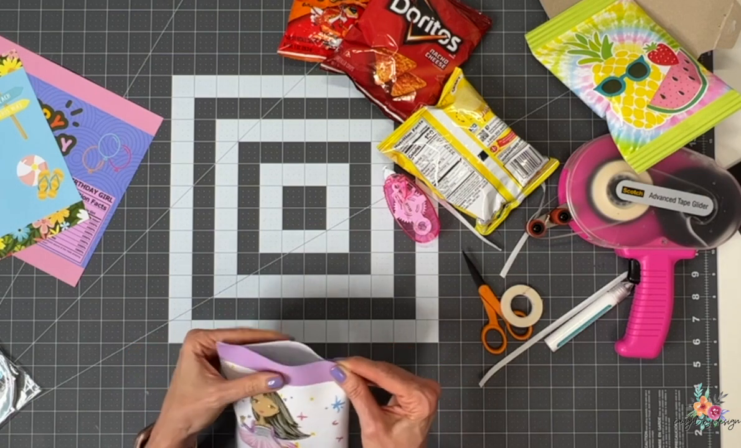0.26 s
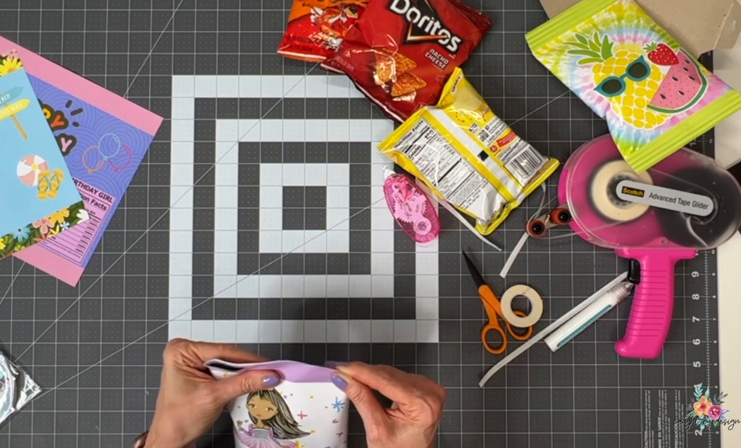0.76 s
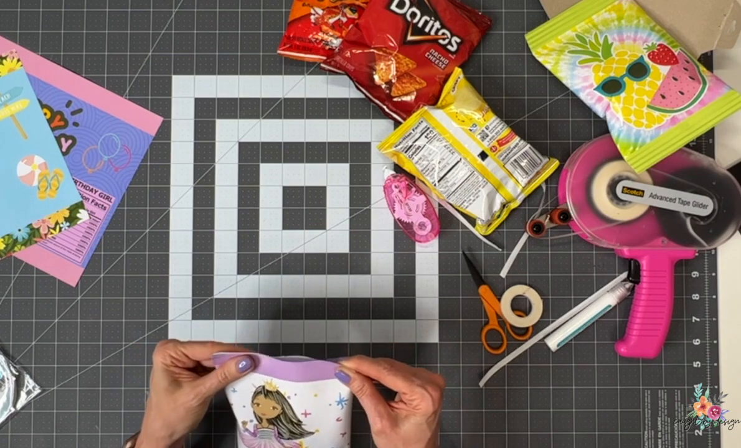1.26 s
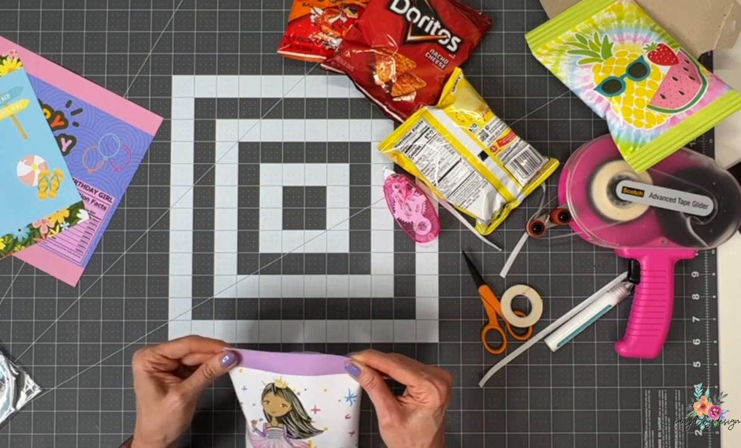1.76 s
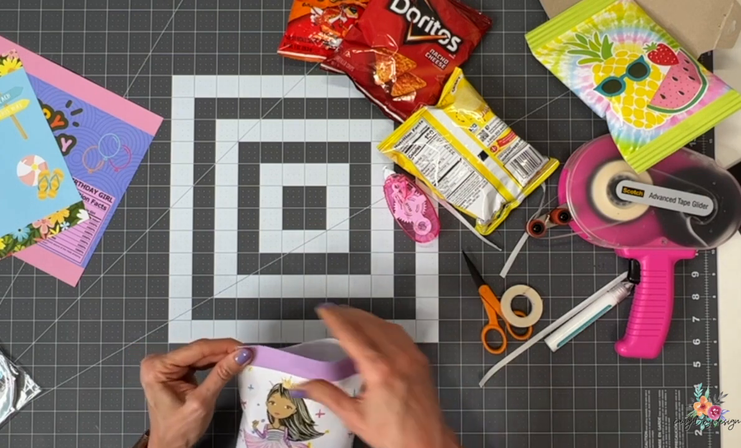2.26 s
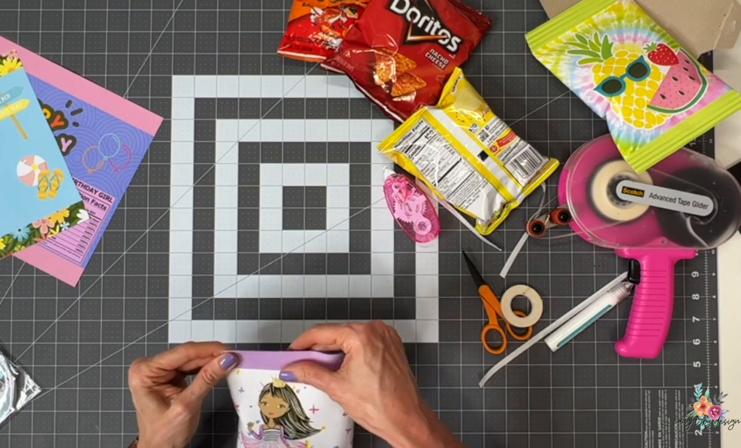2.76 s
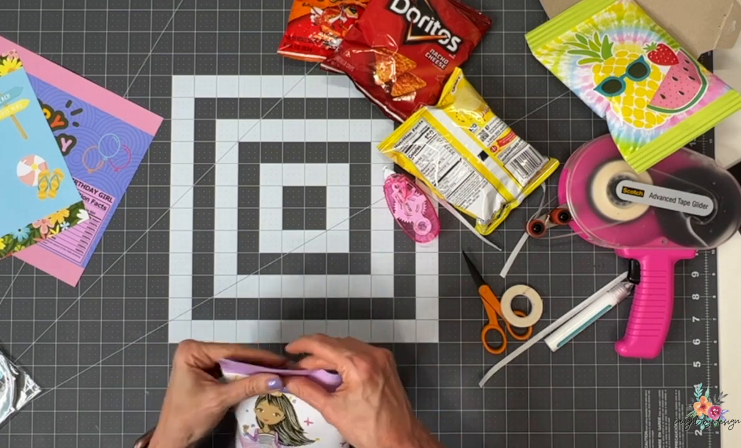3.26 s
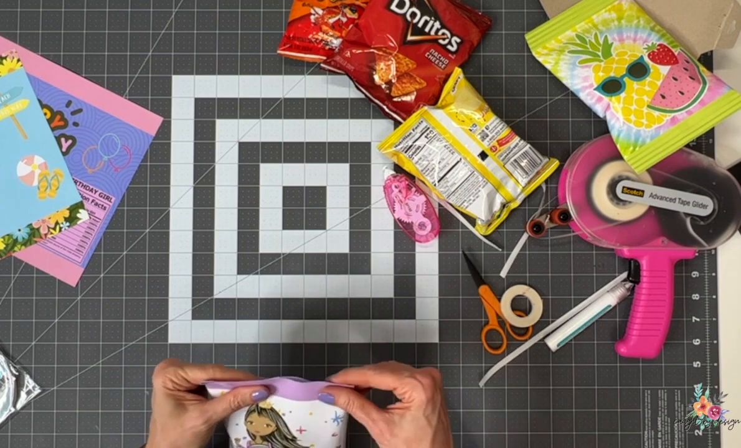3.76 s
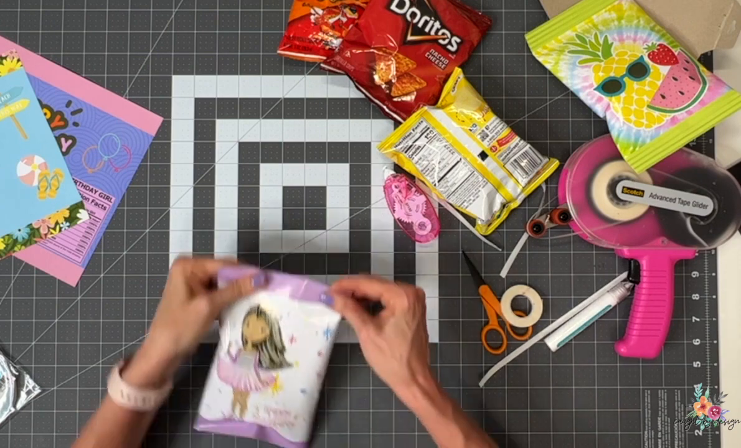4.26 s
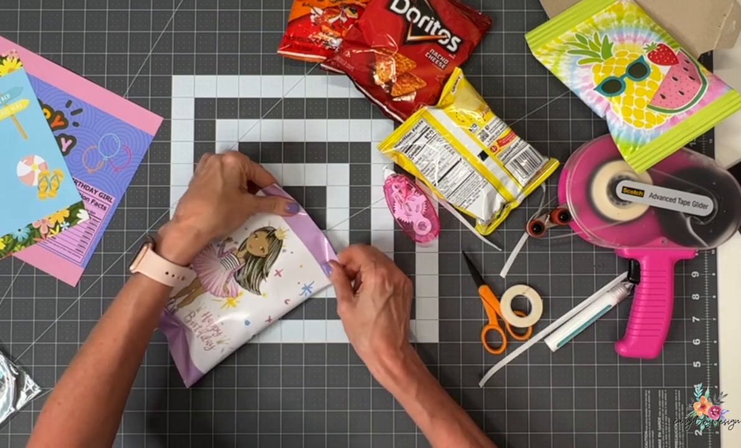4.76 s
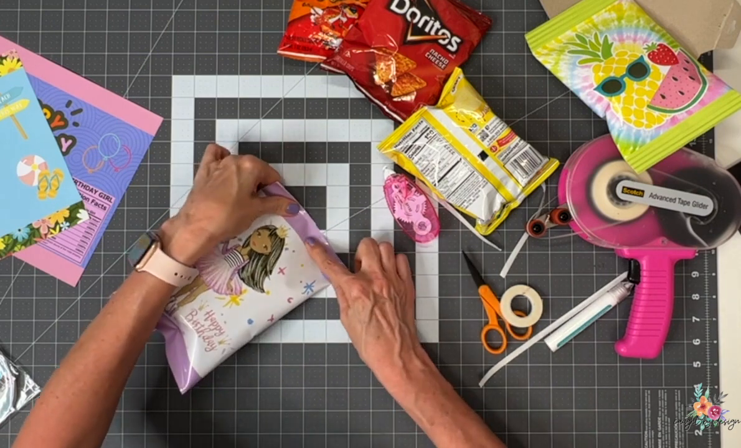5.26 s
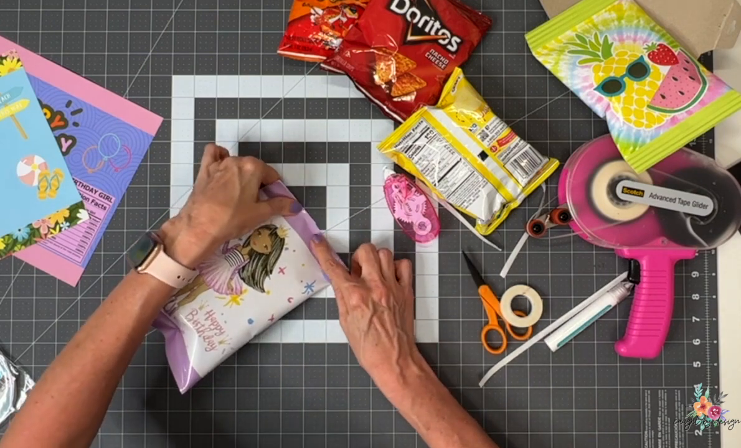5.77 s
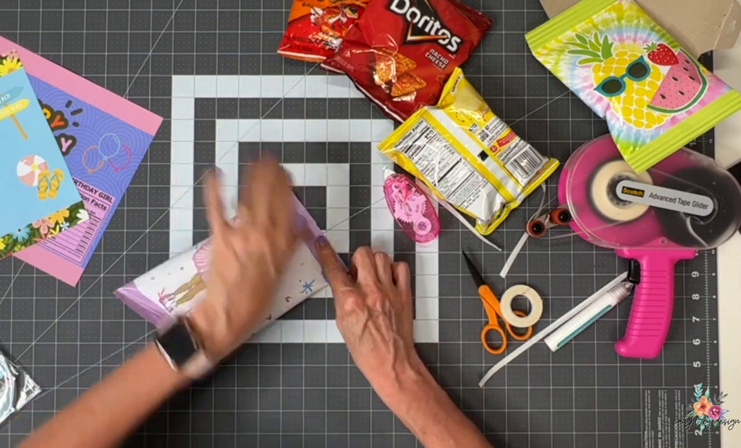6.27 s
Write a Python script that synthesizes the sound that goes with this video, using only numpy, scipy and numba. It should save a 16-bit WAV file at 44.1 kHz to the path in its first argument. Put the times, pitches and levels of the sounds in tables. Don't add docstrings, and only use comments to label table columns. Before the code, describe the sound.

Dry, close paper and foil crackling in short bursts, sparse in the middle, growing fuller and lower as the packet is flattened on a table.

```python
import sys
import numpy as np
from scipy import signal
from scipy.fft import rfft, irfft, next_fast_len
from scipy.io import wavfile
from scipy.ndimage import uniform_filter1d
from numba import njit

SR = 44100
rng = np.random.default_rng(int(sys.argv[2]) if len(sys.argv) > 2 else 0)


def int16_out(signal):
    q = np.round(np.clip(np.atleast_2d(signal).T, -1, 1) * 32767)
    wavfile.write(sys.argv[1], SR, q.astype(np.int16))


def gain_from_db(level_db):
    decades = np.asarray(level_db, float) / 20
    return 10 ** decades


N = 287091
BINS = next_fast_len(N + SR // 2)
HZ = np.arange(BINS // 2 + 1) * SR / BINS


def on_hz(hz, values):
    return np.interp(np.log(HZ + 1), np.log(hz), values)


def colour(x, points):
    hz, db = np.transpose(points)
    inside = (HZ > hz[0]) & (HZ < hz[-1])
    y = irfft(rfft(x, BINS) * gain_from_db(on_hz(hz, db)) * inside, BINS)[:N]
    return y / np.sqrt(np.mean(y ** 2))


@njit
def svf(x, hz, sharp):
    y = np.empty(len(x))
    band, low, damping = 0., 0., 1 / sharp
    for i in range(len(x)):
        g = np.tan(np.pi * hz[i] / SR)
        v = (band + g * (x[i] - low)) / (1 + g * (g + damping))
        band = 2 * v - band
        low = low + 2 * g * v
        y[i] = damping * v
    return y


def decay(t, t60):
    return np.exp(-np.log(1000) * t / t60)


def swarm(rate, spread_db, fade_s):
    happens = rng.random(N) < rate / SR
    sizes = happens * gain_from_db(spread_db * np.minimum(rng.exponential(size=N), 3.2))
    env = np.sqrt(signal.lfilter([1], [1, -np.exp(-1 / (fade_s * SR))], sizes ** 2))
    return env / np.sqrt(np.mean(env ** 2))


def patches(centre_hz, spread, size):
    jumps = np.repeat(np.exp(spread * rng.standard_normal(N // size + 1)), size)[:N]
    return np.clip(centre_hz * jumps, 300, 15000)


# frequency in Hz, level in dB.
ROOM_AIR = [(65, -35.5), (110, -8.5), (1890, -12), (6000, -16.5), (7800, -39.5), (13200, -120)]


def still_air():
    air = gain_from_db(-91) * colour(rng.standard_normal(N), ROOM_AIR)
    return air + gain_from_db(-102) * rng.standard_normal((2, N))


# start in seconds, hold in seconds, paper level in dB,
# bag body in dB over the paper, foil in dB over the paper.
PINCHES = [(0.0, 0.12, -59, 3.5, -5), (.17, 0.038, -61, 3.5, 0), (.25, 0.029, -67.5, 1, -2),
           (.37, 0.059, -71.5, 7, -30), (.455, 0.031, -52.5, -7, -6.5), (.54, 0.11, -54, -1, -3.5),
           (.70, 0.07, -48, 4, -3.5), (.862, 0.037, -52.5, 10, -13), (.945, 0.0049, -67.5, -10, 1.5),
           (1.005, 0.082, -51.5, 3.5, -4.5), (1.19, 0.0053, -81.5, 20.5, -3.5),
           (1.27, 0.029, -67.5, 12.5, -5), (1.33, 0.031, -71, 14, 1.5), (1.49, 0.031, -59.5, 9, -4.5),
           (1.6, 0.019, -62, -0.5, 0.5), (1.7, 0.11, -57.5, 4.5, -7.5), (1.85, 0.05, -64, 3.5, -6.5),
           (2.04, 0.081, -56, 9.5, -6), (2.128, 0.014, -46, -5.5, -2)]
TUCKS = [(2.005, 0.0074, -64, 3, -7), (2.35, 0.065, -88, 5.5, -10.5), (2.442, 0.052, -70, -3.5, -11),
         (2.5, 0.12, -82.5, 3, -13), (2.64, 0.024, -65, -1, -11), (2.69, 0.14, -58.5, -7, -6.5),
         (2.89, 0.054, -60, -3.5, -4.5), (3.0, 0.096, -57.5, -5.5, -3.5), (3.13, 0.02, -64, -1.5, -14),
         (3.26, 0.016, -73, 7.5, -2.5), (3.35, 0.025, -49.5, -5, -5.5), (3.42, 0.059, -68, -29, -2.5),
         (3.492, 0.0024, -74.5, 1, -16), (3.62, 0.019, -68, -2.5, -4.5), (3.69, .13, -54, 0, -7.5),
         (3.87, 0.1, -54, -2.5, -3), (4.08, 0.12, -55.5, 2, -7)]
PRESSES = [(4.235, 0.13, -48, 14.5, -8.5), (4.39, 0.077, -51.5, 11.5, -7), (4.47, 0.045, -59.5, -2, -16.5),
           (4.53, 0.083, -50, 9.5, -6), (4.65, 0.046, -48, 16, -4.5), (4.768, 0.014, -41, 4, -10),
           (4.83, 0.025, -79, 24.5, -30), (4.9, 0.034, -71.5, 11, -8), (4.98, 0.018, -54.5, 9.5, -12.5),
           (5.07, 0.025, -72, 19, -9), (5.14, 0.084, -66, 1, 0.5), (5.21, 0.012, -47, 2, 0),
           (5.245, 0.088, -52, -1, -8.5), (5.41, 0.0047, -82.5, 18, 9), (5.46, 0.034, -83, 15, -3.5),
           (5.553, 0.017, -52, 1, -5.5), (5.62, 0.063, -66, 4, -26.5), (5.69, 0.058, -61.5, 6, -7),
           (5.78, 0.066, -62.5, 9.5, -32), (5.84, 0.081, -65, 15, -8), (6.025, 0.011, -57.5, 6.5, -13),
           (6.06, 0.086, -47.5, 10.5, -7.5), (6.2, 0.015, -73, 12, -4), (6.36, 0.025, -60.5, 8.5, -11.5),
           (6.42, 0.063, -61, 9.5, -2.5), (6.48, .04, -48, 8.5, -10.5)]


def squeezes():
    return np.transpose(list(PINCHES) + list(TUCKS) + list(PRESSES))


PAPER_FALL_DB_S, BODY_FALL_DB_S, FOIL_FALL_DB_S = 350.5, 299.5, 436


def effort(db, fall_db_s):
    rise_db_s = 613.5
    start, hold = squeezes()[:2, :, None]
    t = np.arange(0, N + 64, 64) / SR
    before, after = np.maximum(start - t, 0), np.maximum(t - start - hold, 0)
    each = db[:, None] - rise_db_s * before - fall_db_s * after
    together = 10 * np.log10(np.sum(gain_from_db(each) ** 2, axis=0) + 1e-12)
    return np.interp(np.arange(N) / SR, t, together)


# start in seconds, peak in dB.
KNOCKS = [(0.071, -84), (0.75, -83), (1.189, -80.5), (1.493, -71.5), (3.088, -82.5), (3.368, -87),
          (3.742, -75), (4.236, -72), (4.467, -81), (4.987, -67.5), (5.215, -71), (5.567, -73),
          (5.699, -76.5), (5.913, -72), (6.053, -58), (6.375, -70), (6.421, -73)]


def knocks():
    start, db = np.transpose(KNOCKS)
    coarse = np.arange(0, N, 64)
    age = np.maximum(coarse / SR - start[:, None], 0)
    each = gain_from_db(db[:, None] + 2) * (1 - np.exp(-age / 0.002)) * decay(age, 0.6)
    return np.interp(np.arange(N), coarse, np.sqrt(np.sum(each ** 2, axis=0)))


# frequency in Hz, level in dB.
THUMP = [(45, -32), (63, -5.5), (95, -0.5), (200, 3), (320, 6)]


def table():
    table_hz, laid_down_s, rumble_db = 71, 4.15, -43
    paper_db, body_over = squeezes()[2:4]
    rumble = gain_from_db(effort(paper_db + body_over, BODY_FALL_DB_S) + rumble_db)
    env = np.hypot(knocks(), rumble)
    jolts = swarm(rate=40., spread_db=2.0, fade_s=.03)
    mid, side = (env * colour(rng.standard_normal(N) * jolts, THUMP) for _ in range(2))
    on_table = np.arange(N) > laid_down_s * SR
    mid = mid + 2.6 * svf(mid * on_table, np.full(N, table_hz), 3.7)
    t = np.arange(N) / SR - 6.105
    mid = mid + gain_from_db(-59.5) * np.exp(-(t / .045) ** 2) * np.sin(2 * np.pi * table_hz * t)
    return mid + gain_from_db(-8.5) * side * np.array([[1], [-1]])


# start in seconds, length in seconds, first pitch in Hz, last pitch in Hz, level in dB.
SQUEAKS = [
    (4.549, .035, 517, 526, -37),
    (4.662, 0.044, 800.6, 859, -29),
    (6.47, .04, 1291, 1230, -40.5),
]


def squeaks():
    out = np.zeros(N)
    for start, length, hz0, hz1, db in SQUEAKS:
        count = int(length * SR)
        phase = 2 * np.pi * np.cumsum(np.linspace(hz0, hz1, count)) / SR
        tremble = 1 + uniform_filter1d(rng.standard_normal(SR // 8), size=100)[:count]
        tone = np.sin(phase) + 0.24 * np.sin(2 * phase)
        i = int(start * SR)
        out[i:i + count] += gain_from_db(db) * np.hanning(count) * tremble * tone
    return out


# start in seconds, peak in dB, pitch in Hz, T60 in seconds.
TICKS = [(0.099, -46, 4570, 0.071), (0.9375, -51.5, 6440, 0.036), (1.045, -35, 5510, 0.032),
         (1.36, -47, 10500, 0.037), (1.53, -40, 8800, 0.018), (1.544, -44.5, 13000, .02),
         (1.5757, -38, 10400, 0.017), (1.769, -44, 8000, 0.021), (1.8495, -45, 5100, 0.066),
         (1.887, -47.5, 5800, 0.092), (2.1083, -42, 3970, 0.04), (2.7282, -51, 4860, 0.014),
         (3.377, -53, 4270, 0.018), (3.685, -48, 4200, 0.046), (5.3524, -35.5, 12600, 0.0081),
         (4.2313, -37.5, 3740, 0.023), (4.671, -31, 4100, 0.03), (4.7496, -51.5, 9000, 0.0094),
         (4.7686, -33, 8500, 0.013), (4.781, -34, 8400, .015), (5.134, -47.5, 4470, .05),
         (5.2068, -38, 4130, 0.011), (5.253, -31, 4600, 0.024), (5.291, -40, 4830, 0.088),
         (5.4026, -47.5, 4060, 0.085), (5.5406, -43, 5210, 0.054), (5.5481, -34, 5940, 0.038),
         (5.692, -47.5, 3700, 0.061), (6.1295, -50.5, 4300, 0.029), (6.4931, -30.5, 6270, 0.032)]
# start in seconds, length in seconds, first pitch in Hz, last pitch in Hz, level in dB.
SLIDES = [(0.166, 0.066, 1640, 1690, -59), (0.186, 0.13, 3540, 3100, -57.5), (0.577, 0.032, 344, 338, -56),
          (0.869, 0.055, 1640, 1480, -53), (0.998, 0.024, 580, 570, -38.5), (0.994, 0.034, 1880, 1840, -46),
          (1.26, 0.16, 4740, 4320, -65), (2.107, 0.067, 1000, 980, -51), (2.905, 0.059, 2080, 2020, -62),
          (3.12, 0.053, 3200, 3000, -71), (5.695, .1, 3830, 3960, -58), (1.708, 0.086, 1580, 1650, -74),
          (3.707, 0.15, 1700, 1540, -52), (3.702, 0.16, 483, 460, -63.5), (3.877, 0.055, 1670, 1630, -53),
          (3.884, 0.059, 458, 520, -60), (4.254, 0.093, 470, 510, -45.5), (5.053, 0.033, 1700, 1200, -55),
          (5.72, 0.13, 1150, 1190, -50.5), (5.998, 0.068, 1200, 1010, -52)]


def rustles():
    t = np.arange(SR // 4) / SR
    out = np.zeros((3, N + len(t)))
    shapes = []
    for start, db, hz, t60 in TICKS:
        shapes.append((start, gain_from_db(db) * decay(t, t60), hz + 0 * t, 1.9))
    for start, length, hz0, hz1, db in SLIDES:
        env = gain_from_db(db) * np.sin(np.pi * np.minimum(t / length, 1))
        shapes.append((start, env, np.interp(t, [0, length], [hz0, hz1]), 11.6))
    for start, env, hz, sharp in shapes:
        i = int(start * SR)
        even = np.sqrt(sharp * SR / hz / 4)
        for row, noise in enumerate(rng.standard_normal((3, len(t)))):
            out[row, i:i + len(t)] += svf(env * noise * even, hz, sharp)
    return out[:, :N]


# start in
# seconds, peak in dB, pitch in Hz, swell in seconds.
OTHER_FLIPS = [(.826, -62, 700, 0.00099), (.866, -45, 1260, .002), (.893, -45, 1030, 0.0011),
               (1.06, -44, 1730, 0.0014), (1.69, -46.5, 1680, 0.0008), (2.047, -54, 1900, 0.0014),
               (2.680, -43, 2580, 0.0003), (2.729, -41, 2210, .0004), (2.996, -53, 3630, 0.0034),
               (3.359, -29.5, 3520, 0.00038), (6.269, -61, 2900, .002), (6.275, -59, 2800, 0.0018),
               (.567, -38.5, 1360, .001), (.532, -50, 9000, .0001), (1.137, -53, 784, 0.00047),
               (1.256, -71, 2500, 0.00051), (1.577, -41.5, 1870, 0.00082), (4.921, -62, 1980, 0.00047),
               (5.097, -60, 1490, 0.00092)]
FLIPS = [(0.361, -38.5, 2350, 0.0007), (.360, -44.5, 1534, 0.0015), (0.848, -42, 660, 0.0012),
         (2.728, -55, 1410, 0.0011), (3.9255, -34, 6000, 0.0001), (3.83, -53, 1900, 0.00088),
         (3.845, -50, 1470, 0.0011), (3.873, -43, 2980, 0.0003), (3.887, -46, 1700, 0.00067),
         (3.898, -37.5, 2600, 0.00026), (3.946, -45.5, 1610, 0.0013), (4.205, -40, 910, 0.0006),
         (4.191, -38, 1490, .0006), (4.2345, -27, 1080, 0.00082), (4.2495, -33, 1480, 0.00061),
         (4.293, -29, 1210, 0.0007), (4.312, -48, 1110, .0008), (4.335, -42.5, 560, 0.0054),
         (4.379, -44, 1380, 0.0037), (4.469, -43, 1370, 0.0014), (4.514, -47, 1800, .002),
         (4.535, -38.5, 1190, 0.0041), (4.589, -33.5, 510, 0.0012), (4.631, -40.5, 1040, 0.002),
         (4.752, -38.5, 880, 0.0017), (4.769, -40, 960, .0015), (4.781, -36.5, 885, 0.0012),
         (4.826, -50, 1170, 0.0014), (4.841, -44, 1070, 0.0011), (4.858, -41, 1040, 0.001),
         (4.862, -47, 2850, 0.00097), (5.024, -45, 906, 0.0014), (5.125, -59, 929, 0.0022),
         (5.477, -59.5, 273, 0.0015), (5.547, -50, 1250, 0.00081), (5.58, -48.5, 856, 0.0025),
         (5.792, -50, 1190, 0.0023), (5.859, -40, 1170, .002), (5.867, -40, 1150, 0.0028),
         (5.887, -35.5, 970, 0.0014), (5.893, -44, 1010, 0.0016), (5.907, -39, 1360, 0.00096),
         (5.921, -38.5, 1150, 0.0014), (6.044, -37.5, 990, 0.0015), (6.0665, -29, 1150, 0.0013),
         (6.082, -29.5, 1170, 0.00077), (6.091, -35, 1030, 0.0015), (6.148, -43, 1280, .002),
         (6.416, -43.5, 1260, 0.0018), (6.495, -38, 980, 0.0043)]


def flips():
    t = np.arange(SR // 16) / SR
    out = np.zeros(N + len(t))
    for start, db, hz, swell in list(OTHER_FLIPS) + list(FLIPS):
        i, age = int(start * SR), t / swell
        out[i:i + len(t)] += gain_from_db(db) * age * np.exp(1 - age) * np.sin(2 * np.pi * hz * t)
    return out[:N]


# start in seconds, ring peak in dB, ring pitch in Hz, crack level in dB.
PINCH_POPS = [(0.076, -34, 1340, -43.5), (0.329, -46, 2600, -65), (0.360, -29, 1790, -44),
              (0.461, -34.5, 1650, -39), (0.565, -27.5, 1800, -36), (0.737, -20, 560, -44),
              (0.825, -30.5, 613, -48), (0.848, -42, 629, -40), (0.865, -32, 1660, -42),
              (1.004, -36, 542, -60), (1.041, -46, 1680, -48.5), (1.059, -28.5, 1676, -36),
              (1.256, -48.5, 401, -55), (1.276, -47, 1565, -46.5), (1.291, -36.5, 1400, -49),
              (1.345, -33.5, 1660, -63.5), (1.493, -37, 1725, -46.5), (1.526, -39, 1300, -40.5),
              (1.547, -46, 1360, -43), (1.578, -28, 1390, -40), (1.690, -63, 1660, -54),
              (1.74, -31, 1675, -47), (1.767, -45, 1660, -42.5), (1.85, -59, 354, -55),
              (2.035, -41.5, 1950, -49.5), (2.042, -32, 1920, -45), (2.109, -52, 2060, -54)]
TUCK_POPS = [(2.439, -75, 2350, -53.5), (2.680, -41, 2330, -46.5), (2.729, -38.5, 1920, -41),
             (2.818, -59, 2310, -43.5), (2.883, -78, 2180, -52.5), (3.346, -60, 2150, -49.5),
             (3.359, -37, 1630, -41.5), (3.375, -60, 1630, -37), (3.424, -66, 1925, -45.5),
             (3.487, -59, 1500, -58), (3.684, -67, 1900, -56), (3.777, -32.5, 1615, -40.5),
             (3.874, -36, 1675, -50), (3.922, -28.5, 2430, -41.5), (4.078, -27.5, 987, -41.5),
             (4.092, -25, 980, -43), (4.161, -24.5, 1230, -47.5), (4.197, -21.5, 924, -40),
             (4.235, -32, 1016, -39.5), (4.269, -23, 528, -38), (4.467, -33.5, 1390, -58),
             (4.526, -25.5, 1100, -49), (4.536, -35, 1180, -54), (4.551, -19, 527, -40),
             (4.587, -38, 457, -40.5), (4.651, -21, 576, -50.5), (4.677, -15, 860, -39.5),
             (4.754, -31, 900, -56), (4.842, -52, 1110, -61)]
PRESS_POPS = [(4.858, -45, 1044, -72), (4.981, -35, 897, -37), (5.022, -33, 1950, -53),
              (5.142, -31, 1120, -49.5), (5.211, -32, 930, -39), (5.256, -52, 1215, -49),
              (5.293, -53, 826, -48), (5.403, -58, 1194, -59.5), (5.346, -41, 1274, -42.5),
              (5.554, -28, 1250, -41.5), (5.716, -32, 1196, -67), (5.732, -27.5, 1160, -77),
              (5.768, -32.5, 1210, -70), (5.836, -30.5, 1246, -64.5), (5.859, -33.5, 1157, -48),
              (5.881, -29.5, 1046, -53.5), (5.908, -28.5, 1160, -47), (5.921, -30, 1046, -69),
              (6.043, -20, 1034, -40), (6.064, -25.5, 1153, -45.5), (6.084, -21, 1093, -41),
              (6.146, -22, 1145, -44), (6.271, -46.5, 1188, -71.5), (6.332, -58, 3650, -52.5),
              (6.363, -36, 870, -41.5), (6.416, -42.5, 1230, -50.5), (6.468, -32.5, 1146, -41),
              (6.493, -26, 1220, -39)]


def creases():
    pops = sorted(list(PINCH_POPS) + list(TUCK_POPS) + list(PRESS_POPS))
    start, ring_db, hz, crack_db = np.transpose(pops)
    squeeze_start, foil_over = squeezes()[[0, 4]]
    squeeze = np.maximum(np.searchsorted(squeeze_start, start + .03) - 1, 0)
    fizz_db = crack_db + foil_over[squeeze] - 4.5
    return np.array([start, ring_db, hz, crack_db, fizz_db])


def bursts(db, t60, rise_s):
    t = np.arange(SR // 8) / SR
    power = np.zeros(N + len(t))
    shape = (1 - np.exp(-t / rise_s)) * decay(t, t60)
    for start, peak in zip(creases()[0], gain_from_db(db)):
        i = int(start * SR)
        power[i:i + len(t)] += (peak * shape) ** 2
    return np.sqrt(power[:N])


def at_pops(level):
    out = np.zeros(N)
    out[(creases()[0] * SR).astype(int)] = level
    return out


def pocket_pitch():
    start, _, hz = creases()[:3]
    return hz[np.maximum(np.searchsorted(start * SR, np.arange(N)) - 1, 0)]


def pop_jolts(pocket_hz):
    _, ring_db, hz = creases()[:3]
    jolts = at_pops(gain_from_db(ring_db + 16.5) * np.sqrt(hz.mean() / hz))
    return svf(jolts, pocket_hz, 9.6)


def snaps(paper_db, body_db, foil_db, paper_hz):
    rate, size_db = 110, 17.5
    happens = rng.random(N) < rate / SR
    sizes = gain_from_db(size_db + 4.42 * np.minimum(rng.exponential(size=N), 3))
    kicks = happens * sizes * np.sign(rng.standard_normal(N))
    high = svf(kicks * gain_from_db(paper_db), patches(.85 * paper_hz, .3, size=350), 4.)
    low = svf(kicks * gain_from_db(body_db - 1.5), patches(np.full(N, 1250.), 0.35, size=500), 3.0)
    spark = svf(kicks * gain_from_db(foil_db - 1.0), np.full(N, 12500.), 1.5)
    click_hz = 0.32 * paper_hz
    click = svf(at_pops(gain_from_db(creases()[3] - 4)), click_hz, 0.9)
    return high + low + spark + svf(click, click_hz, 0.9)


def scatter(env):
    power = 0.28 * env ** 2
    for share, t60 in [(0.99, .04), (0.39, 0.13)]:
        keep = np.exp(-2 * np.log(1000) / (t60 * SR))
        power = power + share * signal.lfilter([1 - keep], [1, -keep], env ** 2)
    return np.sqrt(power)


# frequency in Hz, level in dB.
BODY = [(120, 7.5), (300, -4.5), (500, 0.5), (1200, -1.5), (2200, 0), (4500, -22.5)]


def bag_body(drive, ring, body_hz, fold_hz, pocket_hz):
    dull = colour(rng.standard_normal(N), BODY)
    buckling = drive * dull
    out = 0.6 * buckling + 0.75 * svf(buckling, body_hz, 1.6) + 1.3 * svf(buckling, fold_hz, 16.0)
    return out + svf(ring * dull, pocket_hz, 4.5) + 0.12 * ring * dull


# frequency in Hz, level in dB.
PAPER = [(700, -39), (1500, -9), (2500, -0.5), (4500, -2.5), (7000, -4.5), (9000, -21.5)]


def paper_sleeve(drive, paper_hz, small_hz):
    crisp = drive * colour(rng.standard_normal(N), PAPER)
    return 0.5 * crisp + 0.86 * svf(crisp, paper_hz, 0.97) + 1.08 * svf(crisp, small_hz, 31.0)


# frequency in Hz, level in dB.
FOIL = [(6000, -8), (8300, -3), (10000, -8), (12000, -5), (14500, -14), (15800, -2.5)]


def foil_skin(drive, tiny_hz):
    fizz = drive * colour(rng.standard_normal(N), FOIL)
    return 1.01 * fizz + 1.04 * svf(fizz, tiny_hz, 25.2)


def bag():
    db, body_over, foil_over = squeezes()[2:]
    paper_db = effort(db, PAPER_FALL_DB_S)
    body_db = effort(db + body_over, BODY_FALL_DB_S)
    foil_db = effort(db + foil_over, FOIL_FALL_DB_S)
    share_db = np.clip(body_db - paper_db, -12, 16)
    body_hz = 1473 * 2 ** (-share_db / 21.5)
    paper_hz = 4050 * 2 ** (-share_db / 58)

    _, ring_db, _, crack_db, fizz_db = creases()
    pop_t60 = 0.046
    cracks = swarm(rate=380., spread_db=4.0, fade_s=.0025)
    body = gain_from_db(body_db - 4.5) * swarm(rate=250.0, spread_db=5.0, fade_s=0.0079)
    ring = bursts(ring_db - 3.5, pop_t60, rise_s=0.0029)
    paper_pops = bursts(crack_db - 0.5, 1.34 * pop_t60, rise_s=0.0068)
    paper = np.hypot(gain_from_db(paper_db - 2.0) * cracks, paper_pops)
    sparks = cracks ** 0.54
    sparks = sparks / np.sqrt(np.mean(sparks ** 2))
    foil = np.hypot(gain_from_db(foil_db + 0.5) * sparks, bursts(fizz_db, 1.5 * pop_t60, rise_s=0.00057))
    paper = np.hypot(paper, bursts(crack_db + 5.5, 0.13 * pop_t60, rise_s=0.00032))
    foil = np.hypot(foil, bursts(fizz_db + 14.0, 0.11 * pop_t60, rise_s=0.00029))

    pocket_hz = pocket_pitch()
    fold_hz = patches(body_hz, 0.2905, size=1300)
    small_hz = patches(paper_hz, 0.331, size=900)
    tiny_hz = patches(np.full(N, 10500.), 0.16, size=700)
    out = np.empty((3, N))
    for row in range(3):
        if row == 1:
            body, ring, paper, foil = (scatter(env) for env in (body, ring, paper, foil))
        out[row] = bag_body(body, ring, body_hz, fold_hz, pocket_hz)
        out[row] += paper_sleeve(paper, paper_hz, small_hz)
        out[row] += foil_skin(foil, tiny_hz)
    out = out + pop_jolts(pocket_hz) + snaps(paper_db, body_db, foil_db, paper_hz)
    return out + squeaks() + flips() + rustles()


# frequency in Hz, width in Hz, boost in dB.
POUCH = [(452.6, 36.6, 5), (826, 34, 4), (1050, 30, 2), (1390, 32, 4), (1660, 30, 5.5), (2180, 31, 1.5)]


def pouch(paths):
    paths = paths / np.sqrt(1 + (280 / (HZ + 1)) ** 8)
    for hz, width, db in POUCH:
        paths = paths * (1 + (gain_from_db(db) - 1) / (1 + 2j * (HZ - hz) / width))
    return paths


# frequency in Hz, left minus right in dB, lead of the left in radians,
# share of direct sound from 0 to 1.
PORTS = [(60, -2.5, .3, .9), (400, -2, .5, .7), (800, 2.5, 1.1, .7), (2400, .3, 2.1, .4),
         (3400, 1.5, 3.1, .5), (4500, 7, 3.8, .2), (8500, 7, 3.5, .1), (9900, .2, 3.1, .2),
         (10400, 0, 3.0, .8), (10950, 0, 2.9, .88), (11400, 0, 2.3, .75), (12800, 0, .15, .8),
         (14400, 0, -.1, .92), (15300, 0, -2.7, .7)]


def scene():
    hz, lean_db, lead, share = np.transpose(PORTS)
    share, side = on_hz(hz, share), np.array([[.5], [-.5]])
    paths = pouch(rfft(bag(), BINS))
    direct = np.sqrt(share) * np.exp(1j * side * on_hz(hz, lead)) * paths[0]
    ports = direct + np.sqrt(1 - share) * paths[1:] + rfft(table(), BINS)
    heard = irfft(ports * gain_from_db(side * on_hz(hz, lean_db)), BINS)[:, :N]
    return heard + still_air()


def roll_off(x):
    return signal.sosfilt(signal.butter(12, 15900, fs=SR, output="sos"), x)


# frequency in Hz, width in Hz, depth in dB.
NOTCHES = [(5324, 38, -18), (7580, 317, -9.5), (11000, 400, -3.5)]


def record(dry):
    dips_db = sum(db * np.exp(-((HZ - hz) / width) ** 2) for hz, width, db in NOTCHES)
    top = 1 / np.sqrt(1 + (HZ / 15700) ** 80)
    mix = irfft(rfft(dry, BINS) * gain_from_db(dips_db) * top, BINS)[:, :N]
    return roll_off(mix)


dry = scene()
out = record(dry)
int16_out(out)
```